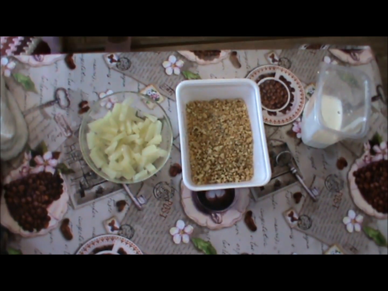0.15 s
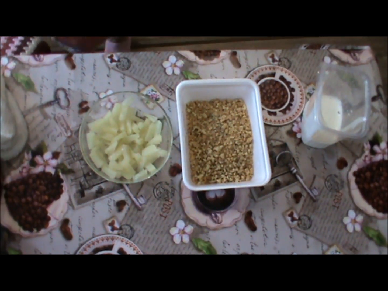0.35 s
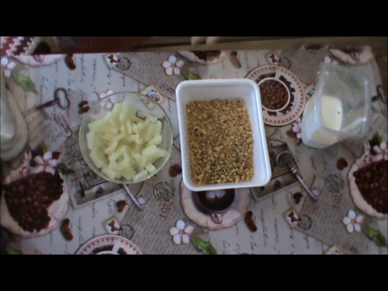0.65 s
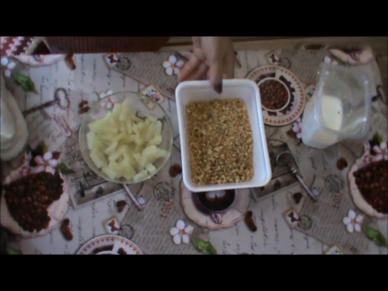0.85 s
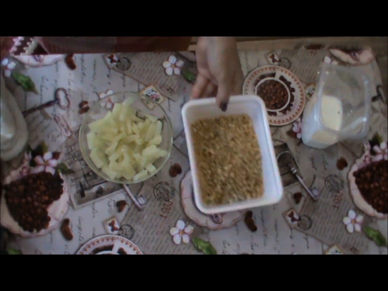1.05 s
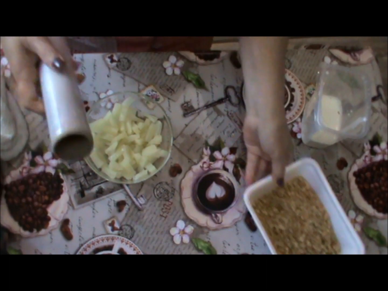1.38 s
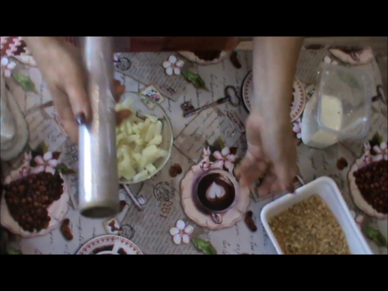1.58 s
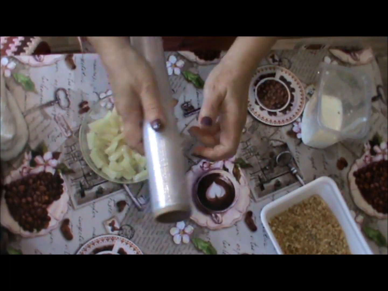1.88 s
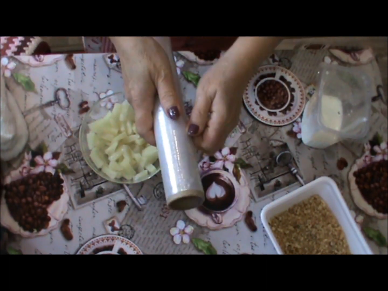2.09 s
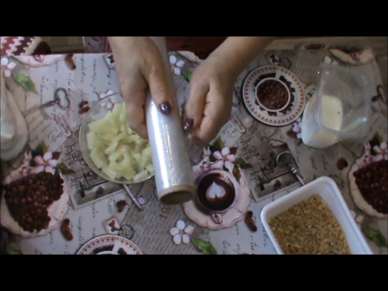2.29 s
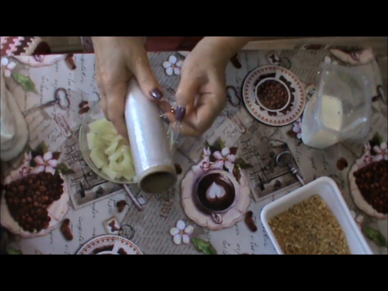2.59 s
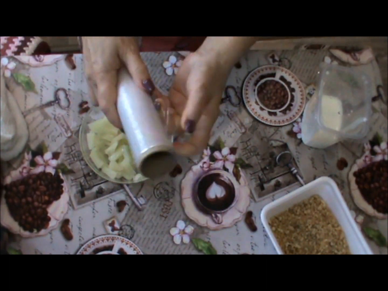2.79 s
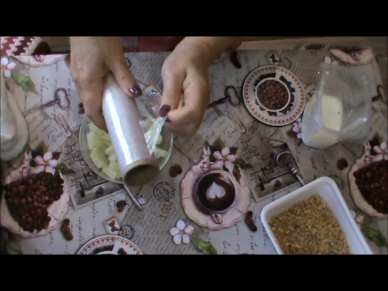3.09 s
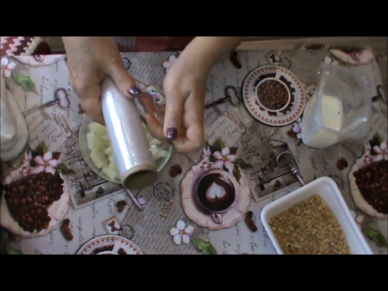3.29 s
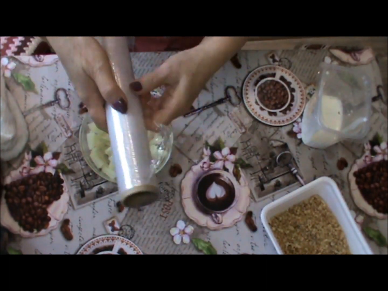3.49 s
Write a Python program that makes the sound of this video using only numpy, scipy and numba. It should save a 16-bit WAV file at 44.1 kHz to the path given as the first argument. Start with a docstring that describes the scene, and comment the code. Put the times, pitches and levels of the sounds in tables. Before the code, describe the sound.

Cling film is the main sound, handled close by in a small kitchen with steady hiss. A hand brushes cloth at 0.3 seconds. From 0.9 to 1.8 seconds a plastic tub is lightly knocked and slid over a tablecloth. From 2 seconds fingernails pick at the film, with crackles, hollow cardboard taps and one tiny squeak. From 2.9 to 3.6 seconds it peels off in three tugs, the taut sheet drumming.

```python
"""A small kitchen with a steady hiss. A hand brushes cloth (0.3 s); cling film snaps once (0.8 s).
Fingers knock a plastic tub and slide it across the tablecloth (0.9-1.8 s). From 2 s fingernails pick
at the edge of the roll of film, which crackles, squeaks once and rings its cardboard tube.
From 2.9 s the film peels off in three tugs, the stretched sheet drumming."""
import sys
import numpy as np
from scipy import signal
from scipy.fft import rfft, irfft, next_fast_len
from scipy.io import wavfile
from scipy.ndimage import uniform_filter1d, map_coordinates
from numba import njit

SR = 44100
rng = np.random.default_rng(int(sys.argv[2]) if len(sys.argv) > 2 else 0)


def materialize(psi):
    """Save the field psi as 16-bit PCM at rate SR to the path in sys.argv[1].

    A 1-D psi becomes a single channel; in a 2-D psi each row is a channel.
    """
    bounded = np.clip(np.atleast_2d(psi).T, -1, 1)
    quanta = np.round(bounded * 32767).astype(np.int16)
    wavfile.write(sys.argv[1], SR, quanta)


N = 160965
T = np.arange(N) / SR
SIDE = np.array([[1], [-1]])


def amp(db):
    """dB to gain."""
    return 10 ** (np.asarray(db) / 20)


def unit(x):
    """Scale to rms 1."""
    return x / np.sqrt(np.mean(x ** 2))


def steady(x, size):
    """Hold rms near 1 over a window of size samples."""
    return x / np.sqrt(uniform_filter1d(x ** 2, size) + 1e-18)


def curve(rows, column=1):
    """Table column interpolated over time."""
    rows = np.array(rows)
    return np.interp(T, rows[:, 0], rows[:, column])


def fader(rows, column=1):
    """Gain from a dB column, zero outside its span."""
    return amp(curve(rows, column)) * (T >= rows[0][0]) * (T <= rows[-1][0])


def colour(x, points, tilt_db_oct=0):
    """Minimum-phase filter through (f/Hz, gain/dB) points, tilted above 1024 Hz."""
    size = 2 * next_fast_len(len(x))
    octave = np.log2(np.maximum(np.fft.rfftfreq(size, 1 / SR), 1))
    hz, db = np.array(points).T
    gain = amp(np.interp(octave, np.log2(hz), db) + tilt_db_oct * np.clip(octave - 10, 0, None))
    cepstrum = irfft(np.log(gain))
    cepstrum[1:size // 2] *= 2
    cepstrum[size // 2 + 1:] = 0
    return irfft(rfft(x, size) * np.exp(rfft(cepstrum)))[:len(x)]


def crackle(per_s, spread_db, size=N):
    """Random clicks of uneven size, rms 1."""
    height, timing, polarity = rng.random((3, size))
    gains = amp(spread_db * np.minimum(-np.log(height + 1e-9), 3))
    return unit((timing < per_s / SR) * np.sign(polarity - .5) * gains + 1e-9)


def burst(decay_s):
    """Exponentially decaying noise."""
    return rng.choice([-1., 1.], 4096) * np.exp(-T[:4096] / decay_s)


def add(out, x, start_s, db):
    """Mix in a short sound; db is its rms if packed into 5 ms."""
    i = max(int(start_s * SR), 0)
    x = x * amp(db) * np.sqrt(.005 * SR / np.sum(x ** 2))
    out[i:i + len(x)] += x[:N - i]


@njit
def resonate(x, hz, width_hz):
    """State-variable band-pass with a moving centre."""
    y, band, low = np.empty(len(x)), 0., 0.
    for i in range(len(x)):
        g, damping = np.tan(np.pi * hz[i] / SR), width_hz / hz[i]
        v = (band + g * (x[i] - low)) / (1 + g * (g + damping))
        band, low = 2 * v - band, low + 2 * g * v
        y[i] = damping * v
    return y


def narrowband(x, hz, width_hz, skirt_hz, size):
    """Two band-passes in series, held near rms 1."""
    return steady(resonate(resonate(x, hz, width_hz), hz, skirt_hz), size)


def ring(x, modes, detune=0):
    """Drive decaying modes (f/Hz, level/dB, t60/s) with x."""
    t = T[:8192]
    shift = 1 + detune * rng.standard_normal(len(modes))
    response = np.zeros(len(t))
    for k, (hz, db, t60) in enumerate(modes):
        decay = np.exp(-np.log(1000) * t / t60)
        response += (-1) ** k * amp(db) * np.sin(2 * np.pi * hz * shift[k] * t) * decay
    return signal.fftconvolve(x, response)[:len(x)]


# Room noise spectrum: f/Hz, level/dB
NOISE_COLOUR = [(15, -30), (25, -6.5), (170, -3.5), (198, 2), (227, -5), (666, -6), (2300, -14.5),
                (15500, -25)]
# Side relative to mid: f/Hz, level/dB
NOISE_SIDE = [(25, -33.5), (400, -7.5), (4000, -3), (15000, -30)]
NOISE_DB = -46.5

def background():
    """Steady room rumble and hiss."""
    mid, side = (unit(colour(rng.standard_normal(N), NOISE_COLOUR)) for _ in range(2))
    return amp(NOISE_DB) * (mid + colour(side, NOISE_SIDE) * SIDE)


# Hand strokes: peak t/s, level/dB, rise/s, fall/s, tilt/(dB/oct)
STROKES = [(.29, -49, 0.086, 0.16, -8.5), (.341, -23.5, 0.007, 0.0054, 10),
           (0.359, -24.5, 0.0032, 0.017, 2.5), (0.466, -27.5, 0.0038, .012, 0)]
# Swish spectrum: f/Hz, level/dB
STROKE_COLOUR = [(500, -21), (1700, -13), (2300, -8.5), (4850, -1.5), (9300, -1.5), (12000, -6.5),
                 (15500, -18.5)]
# After-ring: f/Hz, level/dB re swish, t60/s
STROKE_MODES = [(2182, -24, .12), (3580, -16.5, .045), (4970, -19, .06)]

def brushes():
    """A hand swishes over cloth; a faint high ring follows."""
    out = np.zeros(N)
    for peak_s, db, rise_s, fall_s, tilt in STROKES:
        envelope = np.exp(np.minimum((T - peak_s) / rise_s, (peak_s - T) / fall_s))
        out += amp(db) * envelope * unit(colour(crackle(11000, 2.2), STROKE_COLOUR, tilt))
    rings = sum(amp(db) * unit(ring(out, [(hz, 0, t60)])) for hz, db, t60 in STROKE_MODES)
    return out + np.std(out) * rings


# Film snaps: t/s, crack level/dB, crease f/Hz, tube level/dB, ring centre f/Hz
FILM_SNAPS = [(.826, -42.5, 5200, -62, 1500), (2.017, -30.5, 3420, -55, 2300),
              (2.158, -34, 9300, -40.5, 2600), (2.192, -35, 7300, -32.5, 1340),
              (2.312, -39.5, 5400, -31, 1390), (2.345, -52, 4200, -33.5, 1610),
              (2.356, -32.5, 7440, -27.5, 1490), (2.362, -23.5, 6800, -24, 1920),
              (2.384, -24, 5250, -31, 1150), (2.400, -38, 4200, -30, 1250),
              (2.506, -35.5, 3870, -35.5, 1100), (2.585, -33.5, 6460, -47, 1200),
              (2.620, -27.5, 5540, -53, 2100), (2.637, -30, 5630, -47, 1340),
              (2.648, -34.5, 4100, -48, 1800), (2.7477, -22.5, 9900, -29, 1140),
              (2.758, -33.5, 5940, -35.5, 1110), (2.855, -38, 4600, -30.5, 1440),
              (2.879, -19, 4480, -29, 1100), (3.111, -28, 6860, -33, 1500), (3.141, -30, 4830, -51, 1800),
              (3.290, -24, 4670, -23.5, 1480), (3.549, -44, 4200, -38, 2200)]
# Crack spectrum: ratio to its pitch, level/dB
CRACK_COLOUR = [(.05, -20), (.3, -8), (.7, -6.5), (1, -1), (1.4, -8.5), (2.5, -15.5), (4.5, -23)]
# Cardboard tube: f/Hz, level/dB, t60/s
TUBE_MODES = [(558, -6, 0.018), (1110, 0, 0.035), (1293, -3, 0.026), (1457, -1, 0.038), (1870, -1, 0.028),
              (2433, 7, 0.017)]
CRACK_DECAY_S, NAIL_PUSH_S = .0013, .000068
CRINKLE_DB, CRINKLE_DECAY_S = -5, .017
GRIP_DETUNE, GRIP_LOSS_DB_OCT = .04, 12.5

def snaps():
    """A crease cracks under a nail, crinkles and rings the tube modes the grip leaves free."""
    out = np.zeros(N)
    for start_s, crack_db, crease_hz, tube_db, centre_hz in FILM_SNAPS:
        crack = burst(CRACK_DECAY_S)
        t = T[:len(crack)]
        crinkle = crackle(2000, .62, size=len(t)) * np.exp(-t / CRINKLE_DECAY_S)
        tone = [(ratio * crease_hz, db) for ratio, db in CRACK_COLOUR]
        modes = [(hz, db - GRIP_LOSS_DB_OCT * abs(np.log2(hz / centre_hz)), t60)
                 for hz, db, t60 in TUBE_MODES]
        add(out, colour(crack, tone), start_s, crack_db)
        add(out, colour(crinkle, tone), start_s, crack_db + CRINKLE_DB)
        add(out, ring(np.exp(-t / NAIL_PUSH_S), modes, GRIP_DETUNE), start_s, tube_db)
    return out


# Finger knocks: t/s, level/dB
TUB_KNOCKS = [(.872, -36.5), (.881, -38), (0.934, -39.5)]
# Knock spectrum: f/Hz, level/dB
TUB_COLOUR = [(150, -12), (1000, -8.5), (1450, 2), (2200, -7), (3200, -14), (15000, -41)]
# Sliding friction: t/s, level/dB
SLIDE_LEVEL = [(.89, -57), (.945, -37.5), (1.01, -43.5), (1.08, -34.5), (1.14, -35.5), (1.21, -42),
               (1.35, -35), (1.55, -38.5), (1.68, -46.5), (1.76, -70)]
# Friction spectrum: f/Hz, level/dB
WEAVE_COLOUR = [(120, -6.5), (400, -16), (900, -6.5), (2300, -7.5), (4500, -0.5), (12500, -1.5),
                (16000, -11)]
LEFT_LAG_S = .00001

def tub():
    """Fingers knock the tub, just right of centre; it hisses over the weave, brighter once gliding."""
    weave = crackle(15000, 1.9)
    shove = unit(colour(weave, WEAVE_COLOUR, tilt_db_oct=-3))
    glide = unit(colour(weave, WEAVE_COLOUR))
    gliding = np.clip((T - .96) / .13, 0, 1)
    out = (shove + gliding * (glide - shove)) * fader(SLIDE_LEVEL)
    for start_s, db in TUB_KNOCKS:
        add(out, colour(burst(decay_s=.0027), TUB_COLOUR), start_s, db)
    left = map_coordinates(out, [(T - LEFT_LAG_S) * SR], order=5)
    return np.array([left, out])


CREASE_LOW_HZ, CREASE_HIGH_HZ, CREASE_Q, CREASE_DB = 839, 10330, 12, -4.5

def creases():
    """Tiny creases pop at random, each size ringing at its own pitch."""
    pops = sum(resonate(crackle(per_s=28, spread_db=3), np.full(N, hz), hz / CREASE_Q) / np.sqrt(hz)
               for hz in np.geomspace(CREASE_LOW_HZ, CREASE_HIGH_HZ, 16))
    return amp(CREASE_DB) * unit(pops)


# Fingertip friction: t/s, level/dB
RUB_LEVEL = [(2.12, -63), (2.17, -44), (2.27, -49), (2.40, -39), (2.47, -44.5), (2.55, -74), (2.645, -40.5),
             (2.70, -48.5)]
# Film crackle spectrum, rub and peel: f/Hz, level/dB
FILM_COLOUR = [(150, -32), (350, 2), (700, 1), (1200, 0.5), (2300, 3), (5200, 4), (9500, -1.5),
               (13000, -4.5), (16000, -11)]
RUB_TUBE_DB = -5.5

def rub():
    """Fingertips rub and crease the film, stirring the tube's lowest mode."""
    grain = crackle(1500, 7.3)
    friction = unit(colour(grain, FILM_COLOUR, tilt_db_oct=2.5))
    tube = amp(RUB_TUBE_DB) * unit(ring(grain, TUBE_MODES[:1]))
    return (friction + creases() + tube) * fader(RUB_LEVEL)


# Fingertip squeak: t/s, f/Hz, level/dB
SQUEAK_TRACK = [(2.570, 7360, -47), (2.583, 8800, -28), (2.590, 8700, -38), (2.612, 8640, -39),
                (2.625, 8500, -53)]

def squeak():
    """A fingertip squeaks once on the film."""
    tone = narrowband(rng.standard_normal(N), curve(SQUEAK_TRACK), 500., 900., size=300)
    return tone * fader(SQUEAK_TRACK, column=2)


# Peel crackle: t/s, level/dB
PEEL_LEVEL = [(2.875, -36), (2.902, -32), (2.945, -26.5), (2.968, -31.5), (2.999, -23.5), (3.025, -31),
              (3.056, -35.5), (3.11, -31.5), (3.16, -25), (3.225, -39.5), (3.293, -23.5), (3.31, -32),
              (3.36, -45.5), (3.393, -34), (3.43, -43.5), (3.45, -32), (3.48, -37), (3.515, -48.5),
              (3.565, -41.5), (3.65, -53.5)]
# Treble lift, bright in the first and last tugs, dull in the slow middle one: t/s, level/dB
TREBLE_LIFT = [(2.905, -2.5), (2.935, 2.5), (3.01, 2), (3.17, -3.5), (3.25, 2.5), (3.47, -1.5)]
# Film resonance: f/Hz, width/Hz, level/dB
FILM_MODES = [(4530, 65, -16.5)]
TREBLE_HZ, PEEL_TUBE_DB, CLUMP_DB = 6850, -16.5, 1.5

def peel():
    """Film leaves the roll in tiny jerks that drive film, tube, edge and sheet, while creases pop."""
    jerks = steady(crackle(per_s=4000, spread_db=1.9), size=700)
    film = sum(amp(db) * unit(resonate(jerks, np.full(N, float(hz)), float(width_hz)))
               for hz, width_hz, db in FILM_MODES)
    tube = amp(PEEL_TUBE_DB) * unit(ring(jerks, TUBE_MODES))
    crackling = unit(colour(jerks, FILM_COLOUR)) + film + tube + creases()
    highpass = signal.butter(2, TREBLE_HZ, "high", fs=SR, output="sos")
    crackling += (amp(curve(TREBLE_LIFT)) - 1) * signal.sosfiltfilt(highpass, crackling)
    bunching = unit(uniform_filter1d(rng.standard_normal(N), size=260))  # clumps of about 6 ms
    crackling *= unit(amp(CLUMP_DB * bunching))
    return crackling * fader(PEEL_LEVEL) + sheet(jerks) + edge(jerks)


# Free sheet: t/s, f/Hz, level/dB
DRUM_TRACK = [(2.90, 746, -35), (2.96, 670, -41.5), (2.993, 555, -24), (3.025, 524, -48), (3.06, 418, -32),
              (3.122, 411, -21), (3.15, 417, -28), (3.245, 456, -62), (3.275, 550, -29), (3.31, 430, -53)]
# Sheet modes: frequency ratio, level/dB
DRUM_MODES = [(0.999, -0.5), (1.348, -6)]
DRUM_WIDTH_HZ = 36.

def sheet(jerks):
    """The taut sheet drums, lower as it lengthens."""
    hz = curve(DRUM_TRACK)
    drum = sum(amp(db) * narrowband(jerks, ratio * hz, ratio * DRUM_WIDTH_HZ, skirt_hz=290., size=900)
               for ratio, db in DRUM_MODES)
    return drum * fader(DRUM_TRACK, column=2)


# Edge resonance: t/s, f/Hz, level/dB
EDGE_TRACK = [(2.91, 2564, -39), (3.08, 1450, -58), (3.19, 1850, -37), (3.245, 1670, -57),
              (3.277, 1230, -23), (3.293, 1430, -34), (3.32, 1310, -71), (3.435, 2000, -68),
              (3.447, 2400, -36), (3.52, 2160, -48)]

def edge(jerks):
    """The peeling edge rasps at a resonance that moves with the pull."""
    rasp = narrowband(jerks, curve(EDGE_TRACK), width_hz=520., skirt_hz=900., size=500)
    return rasp * fader(EDGE_TRACK, column=2)


SLIP_START_S, SLIP_END_S, SLIPS_PER_S, SLIP_HZ, SLIP_DB = 3.08, 3.18, 190, 6260, -36

def slips():
    """In the slow middle of the pull the film sticks and slips in ragged ticks."""
    out = np.zeros(N)
    for start_s in np.arange(SLIP_START_S, SLIP_END_S, 1 / SLIPS_PER_S):
        late, size, pitch = rng.uniform(-1, 1, 3)
        tone = [(ratio * SLIP_HZ * 2 ** (pitch / 2), db) for ratio, db in CRACK_COLOUR]
        tick = colour(burst(CRACK_DECAY_S / 2), tone)
        add(out, tick, start_s + .18 * late / SLIPS_PER_S, SLIP_DB + 4 * size)
    return out


# Echo spectrum: f/Hz, level/dB
ECHO_COLOUR = [(100, -7), (500, 2), (2000, 5), (6000, -0.5), (15000, -5)]
EARLY_DB, EARLY_DECAY_S, TAIL_DB, TAIL_T60_S, ROOM_WIDTH = -15, .01, -10.5, .38, .47

def room(x):
    """Early echoes off table and walls, then a short tail; mid and side are independent."""
    t = T[:SR // 2]
    arrived = t > .003

    def echoes():
        early = crackle(1500, 1.5, size=len(t)) * np.exp(-t / EARLY_DECAY_S) * arrived
        tail = rng.standard_normal(len(t)) * np.exp(-np.log(1000) * t / TAIL_T60_S) * arrived
        response = (amp(EARLY_DB) * unit(early) + amp(TAIL_DB) * unit(tail)) / np.sqrt(len(t))
        return signal.fftconvolve(x.mean(axis=0), colour(response, ECHO_COLOUR))[:N]
    return x + echoes() + ROOM_WIDTH * echoes() * SIDE


FILM_LEFT_DB, LOWPASS_HZ = .9, 15750

def scene():
    """Film, cloth and tub in the room, over its hiss."""
    film = (snaps() + peel() + slips() + rub() + squeak()) * amp(SIDE * FILM_LEFT_DB / 2)
    return room(film + brushes() + tub()) + background()


def record(dry):
    """Steep elliptic low-pass."""
    return signal.sosfilt(signal.ellip(10, .2, 80, LOWPASS_HZ, fs=SR, output="sos"), dry)


dry = scene()
out = record(dry)
materialize(out)
```